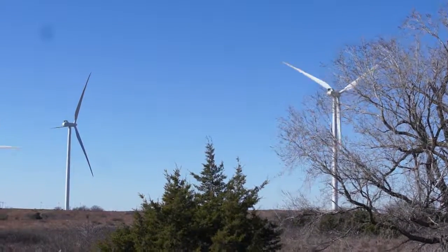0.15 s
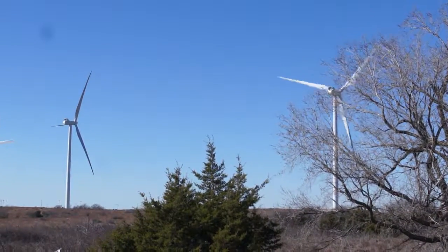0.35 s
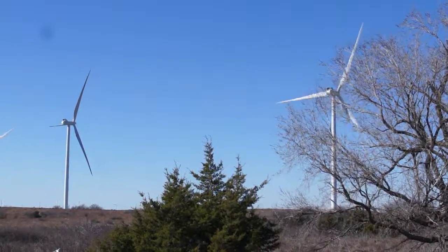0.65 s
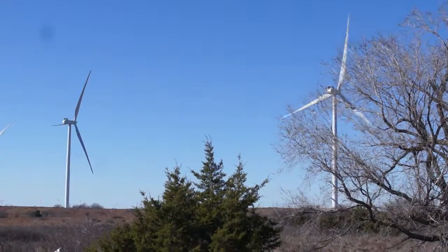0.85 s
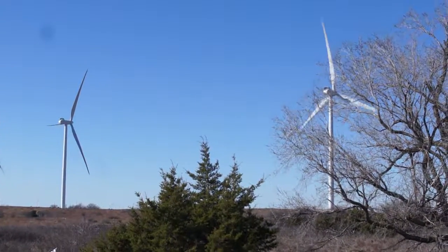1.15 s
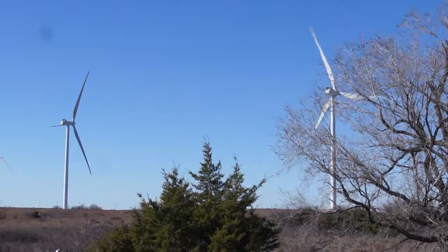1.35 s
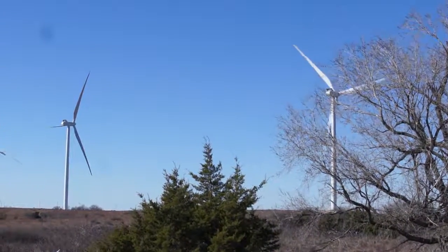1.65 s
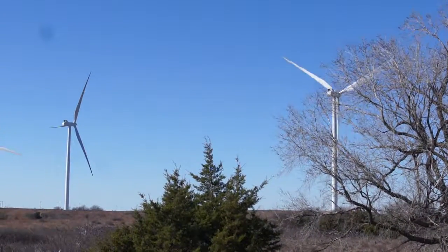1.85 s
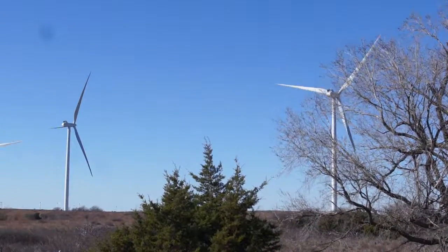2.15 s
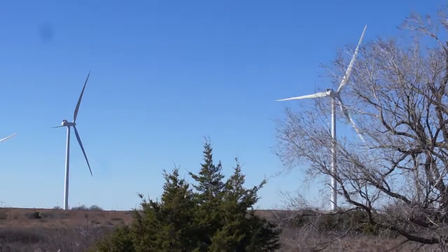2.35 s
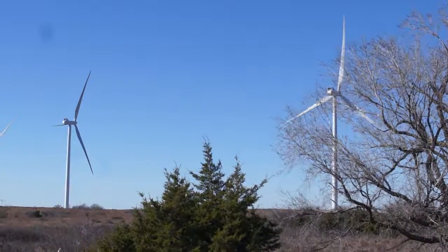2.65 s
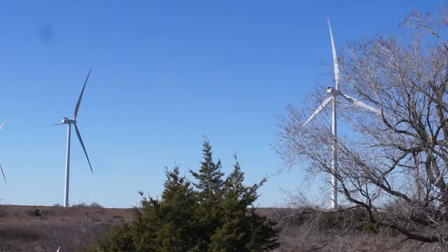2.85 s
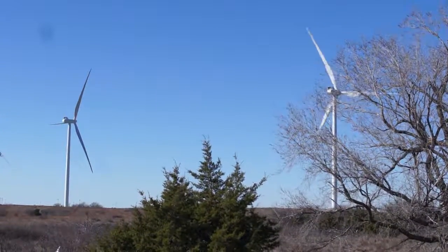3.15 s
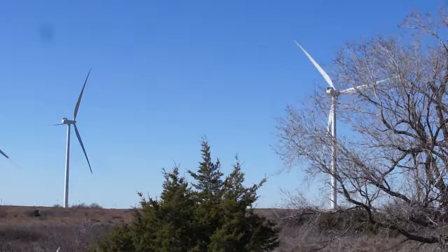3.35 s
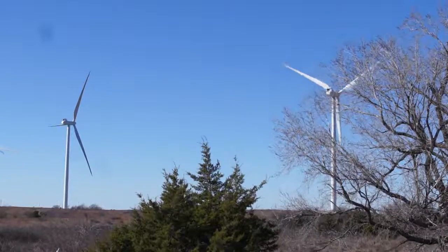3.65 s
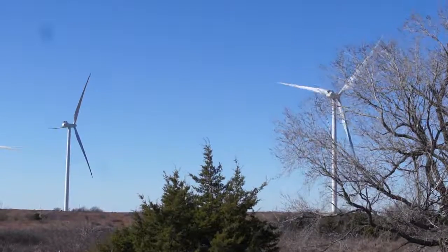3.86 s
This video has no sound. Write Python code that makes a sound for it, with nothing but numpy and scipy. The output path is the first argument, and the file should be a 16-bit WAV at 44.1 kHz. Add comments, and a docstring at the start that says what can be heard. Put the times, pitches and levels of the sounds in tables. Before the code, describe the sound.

Distant roar, probably turbine blades and traffic, fades early, returns midway and swells strongest at the end, with low drones, wind buffets and faint hiss on an open plain, through a small stereo camera.

```python
"""An open plain with wind turbines, heard through the two microphone ports of a small stereo camera.
Far off, a roar, probably blades and traffic, swells and fades: bands of noise, one singing near 615 Hz.
Two low machine drones sink slowly under it, with thin engine overtones, all made of sine tones.
At the ports wind rumbles and buffets, and dry branches hiss faintly, all shaped noise.
The camera adds a thin electronic buzz, a comb of high harmonics."""
import sys
import numpy as np
from scipy import signal
from scipy.fft import rfft, irfft
from scipy.io import wavfile

SR = 44100
rng = np.random.default_rng(int(sys.argv[2]) if len(sys.argv) > 2 else 0)


def int16_out(signal):
    """Quantize to a 16-bit WAV file."""
    q = np.round(np.clip(np.atleast_2d(signal).T, -1, 1) * 32767)
    wavfile.write(sys.argv[1], SR, q.astype(np.int16))


N = 175959
T = np.arange(N) / SR  # time [s]
FREQS = np.arange(N // 2 + 1) * SR / N  # spectrum bins [Hz]


def undb(db):
    """Decibels to gain."""
    return 10 ** (np.asarray(db) / 20)


def curve(table, axis=1):
    """Gain over time from one dB column of a table."""
    rows = np.array(table)
    return undb(np.interp(T, rows[:, 0], rows[:, axis]))


def pan(db):
    """Left and right gains for a level difference; positive leans left."""
    return undb(np.array([[db], [-db]]) / 2)


def walk(rate_hz):
    """Smooth random motion with a spread of 1, slower than about rate_hz."""
    spectrum = rfft(rng.standard_normal(N)) / (1 + (FREQS / rate_hz) ** 4)
    motion = irfft(spectrum, N)
    return (motion - motion.mean()) / motion.std()


def colour(table):
    """Left and right frequency responses, joined on a log pitch scale, with an added roll-off on top."""
    hz, left, right = np.array(table).T
    levels_db = [np.interp(np.log(FREQS + 1), np.log(hz), side) for side in (left, right)]
    return undb(levels_db) / (1 + (FREQS / hz[-1] / 2) ** 2)


def resonance(hz, width_hz):
    """Response of one resonance with steep skirts."""
    skirt_hz = 127  # how far the skirts reach
    peak = 1 / (1 + 2j * (FREQS - hz) / width_hz)
    return peak / np.sqrt(1 + ((FREQS - hz) / skirt_hz) ** 6)


def air(response, likeness=0, lag_s=0):
    """Unit stereo noise through a response; the part shared by both ports reaches the left one later."""
    shared, left, right = rfft(rng.standard_normal((3, N)))
    share = np.clip(likeness, 0, 1)
    both = np.array([shared * np.exp(-2j * np.pi * FREQS * lag_s), shared])
    own = np.array([left, right])
    noise = irfft((np.sqrt(share) * both + np.sqrt(1 - share) * own) * response, N)
    return noise / noise.std()


# strong partials of the camera's buzz, before the common trim:
# (harmonic number, left level [dB], right level [dB], likeness of the two channels [-1 to 1])
BUZZ_PARTIALS = [(14, -62, -66, 0.8), (15, -68, -64, 0.3), (19, -64, -63, -0.3), (20, -62, -59, -0.6),
                 (21, -73, -65, -1.0), (22, -64, -70, 0.3), (24, -58, -57, -0.3), (25, -64, -61, -0.3),
                 (27, -63, -70, 0.5), (29, -74, -68, -0.3), (30, -60, -62, 0.6), (32, -64, -60, -1.0),
                 (33, -67, -66, 0.7), (40, -78, -55, -0.8), (41, -67, -73, 1.0), (42, -57, -60, -0.9),
                 (43, -67, -68, -0.7), (45, -67, -68, -0.0), (47, -69, -67, 0.0), (51, -66, -69, -1.0),
                 (53, -61, -66, -1.0), (55, -60, -80, -0.8), (56, -65, -78, -0.4), (59, -67, -70, 0.4),
                 (60, -59, -80, -0.6), (61, -64, -72, -0.1), (63, -63, -74, 0.6), (64, -68, -74, -1.0),
                 (66, -67, -77, 0.5), (68, -64, -72, -0.8), (69, -67, -66, -0.1), (74, -80, -63, -0.6),
                 (76, -73, -61, -0.8), (78, -66, -72, -0.6), (79, -67, -74, -0.8), (81, -67, -76, 0.8),
                 (82, -80, -68, 0.8)]
BUZZ_HZ, BUZZ_TRIM_DB = 123.464, 0.5
WEAK_PARTIAL_DB, WEAK_SCATTER_DB = -74, -1  # the partials missing from the table
# one partial swells for a while; the half length is where the bump has fallen to 1/e
SWELLING_PARTIAL, SWELL_AT_S, SWELL_HALF_S, SWELL_DB = 40, 1.4, 0.33, 3.9


def camera_buzz():
    """A comb of high harmonics of one low pitch, with its own level and phase in each channel."""
    strong = {int(row[0]): row[1:] for row in BUZZ_PARTIALS}
    buzz = np.zeros((2, N))
    for k in range(14, 89):
        weak_levels = WEAK_PARTIAL_DB + WEAK_SCATTER_DB * rng.standard_normal(2)
        weak = (*weak_levels, rng.uniform(-0.65, 1))
        left_db, right_db, likeness = strong.get(k, weak)
        gain = undb([[left_db], [right_db]])
        if k == SWELLING_PARTIAL:
            bump = np.exp(-((T - SWELL_AT_S) / SWELL_HALF_S) ** 2)
            gain = gain * undb(SWELL_DB * (bump - .5))
        # the phase between the channels sets how alike they are
        between = np.arccos(np.clip(likeness, -1, 1))
        phase = rng.uniform(0, 2 * np.pi) + np.array([[0], [between]])
        buzz += gain * np.sin(2 * np.pi * k * BUZZ_HZ * T + phase)
    return buzz * np.sqrt(2) * undb(BUZZ_TRIM_DB)


# colour of the hiss of branches and microphone: (frequency [Hz], left level [dB], right level [dB])
HISS_COLOUR = [(800, -35, -40), (1850, 14.5, 15), (3000, 9, 9), (5400, 6, 3.5), (7450, 5, 2.5),
               (10400, 4, 1), (10500, -6.5, -3)]
# loudness of the hiss: (time [s], level [dB])
HISS_LEVEL = [(0, -52.5), (1.7, -52.5), (2.3, -50.5), (2.55, -46.5), (2.85, -46.5), (3.15, -49.5),
              (3.4, -51.5), (3.53, -47), (3.68, -51.5), (3.99, -49)]


def hiss():
    """Faint noise, separate at each port, that lifts as the breeze passes through dry branches."""
    return air(colour(HISS_COLOUR)) * curve(HISS_LEVEL)


# colour of the steady wind rumble: (frequency [Hz], left level [dB], right level [dB])
RUMBLE_COLOUR = [(10, -71, -71), (22, -38, -39), (45, -39, -34), (71, -7, 6), (93, 5, 0), (109, -1.5, -5),
                 (155, 0, -1), (211, 1, 2), (324, -2.5, -5.5), (390, -10.5, -7), (648, 6, -10),
                 (1500, -26, -36)]
RUMBLE_DB, RUMBLE_WAVER_DB, RUMBLE_LIKENESS, RUMBLE_LAG_S = -37.5, 0.54, 0.8, 0.00032
# buffets on the ports, before the eddies' own waver:
# (time [s], half length to 1/e [s], left level [dB], right level [dB], level of the deep thump [dB])
BUFFETS = [(0.8, 0.056, -39, -30.5, -63), (1.015, 0.15, -52, -34.5, -55), (1.47, 0.1, -41, -39, -41),
           (1.954, 0.073, -36, -39, -39.5), (2.337, 0.03, -47, -33, -51), (2.424, 0.066, -31, -36, -41),
           (2.775, 0.031, -58, -33, -46)]
# colour of a buffet: (frequency [Hz], left level [dB], right level [dB])
BUFFET_COLOUR = [(40, -4, -62), (106, 0.5, 7.5), (218, 2.5, 1), (323, -2, -3.5), (473, -14.5, -24),
                 (1200, -37, -40)]
# colour of its deep thump: (frequency [Hz], left level [dB], right level [dB])
THUMP_COLOUR = [(10, -60, -60), (22, -22, -23), (36, -2, -12), (65.3, 0, 10), (100, 10, 6), (220, -20, -37)]


def wind():
    """A steady rumble, and short eddies whose noise differs from port to port."""
    rumble = air(colour(RUMBLE_COLOUR), RUMBLE_LIKENESS, RUMBLE_LAG_S)
    out = rumble * undb(RUMBLE_DB + RUMBLE_WAVER_DB * walk(2.4))
    eddy = air(colour(BUFFET_COLOUR)) * undb(1.8 * walk(36))
    thump = air(colour(THUMP_COLOUR))
    for at, half, left_db, right_db, thump_db in BUFFETS:
        swell = np.exp(-((T - at) / half) ** 2)
        out = out + swell * (eddy * undb([[left_db], [right_db]]) + thump * undb(thump_db))
    return out


# distant machine drones, before waver and flutter:
# (pitch at the start [Hz], sag [Hz/s], level at the start [dB], rise [dB/s], pan to the left [dB])
DRONES = [(126.6, 0.98, -47.5, 2, -1.5), (80.6, 0.67, -49.5, 1.1, 5.5)]
DRONE_WAVER, DRONE_FLUTTER_DB = 0.0019, -1  # waver is a fraction of the pitch
DRONE_LAG_S = 0.00085  # the left port hears them this much later


def drones():
    """Two low sine tones of distant machinery, wavering and slowly sinking in pitch."""
    out = 0
    for hz, sag, db, rise, pan_db in DRONES:
        pitch = (hz - sag * T) * (1 + DRONE_WAVER * walk(1.5))
        cycles = np.cumsum(pitch) / SR - hz * np.array([[DRONE_LAG_S], [0]])
        tone = np.sqrt(2) * np.sin(2 * np.pi * cycles)
        level_db = db + rise * T + DRONE_FLUTTER_DB * walk(1.3)
        out = out + tone * undb(level_db) * pan(pan_db)
    return out


# overtones of the higher drone's engine:
# (order of its shaft rate, level against the roar's singing column before the trim [dB])
ENGINE_LINES = [(14, -14), (15, -5), (17, -14), (18, -15), (21, -18), (23, -19)]
FIRINGS_PER_TURN = 3
LINES_TRIM_DB, LINES_WAVER = -2, 0.0021  # waver is a fraction of the pitch


def engine_whine():
    """Clean overtones of the distant engine that rise and fall with the roar's singing band."""
    hz, sag = DRONES[0][:2]
    shaft_hz = (hz - sag * T) * (1 + LINES_WAVER * walk(6.1)) / FIRINGS_PER_TURN
    turns = np.cumsum(shaft_hz) / SR - shaft_hz * np.array([[SING_LAG_S], [0]])
    tones = sum(undb(db) * np.sin(2 * np.pi * (k * turns + rng.random())) for k, db in ENGINE_LINES)
    return np.sqrt(2) * tones * curve(ROAR, axis=1) * undb(LINES_TRIM_DB) * pan(SING_PAN_DB)


# distant roar, each band before its trim and the common flutter:
# (time [s], singing level [dB], body level [dB], hoot level [dB], upper band level [dB])
ROAR = [(0, -30, -32, -28.5, -31.5), (.12, -33.5, -29, -29.5, -38.5), (.3, -29.5, -35.5, -33.5, -34),
        (.55, -42.5, -35.5, -39, -39), (.9, -37.5, -34, -43, -40.5), (1.22, -41, -36.5, -42, -41.5),
        (1.42, -29, -31.5, -31.5, -35), (1.75, -28.5, -31.5, -34, -38.5), (2.05, -34, -35.5, -39, -40),
        (2.5, -34, -44, -35, -41.5), (2.8, -32.5, -37.5, -40.5, -39.5), (2.97, -25, -43, -37, -38.5),
        (3.15, -23, -31, -38.5, -37), (3.33, -21.5, -30, -28.5, -35.5), (3.5, -24, -35.5, -34.5, -38.5),
        (3.66, -26, -37.5, -35, -36), (3.8, -22.5, -33, -32, -40), (3.99, -19.5, -32, -35, -43)]
# colour of the roar's body: (frequency [Hz], left level [dB], right level [dB])
BODY_COLOUR = [(370, -23, -26), (468, -20.5, -9), (572, -3, 4), (637, -0.5, -1), (682, -4.5, 3.5),
               (780, -7.5, 8), (850, 9.5, 5), (882, -21, -7.5), (940, -7, -22), (1070, -27, -36),
               (1300, -40, -23.5)]
# colour of the roar's upper band: (frequency [Hz], left level [dB], right level [dB])
UPPER_COLOUR = [(840, -63, -35), (1048, 0, -1.5), (1258, 2.5, 5.5), (1260, -11.5, 9.5), (1530, 3.5, -2),
                (1890, -26.5, -8), (1890, -8, -11.5), (2220, -17, -13), (3060, -26, -61.5)]
SING_HZ, SING_WIDTH_HZ, SING_TRIM_DB, SING_PAN_DB = 614.3, 37, -2.45, 1.5
HOOT_HZ, HOOT_WIDTH_HZ, HOOT_TRIM_DB, HOOT_PAN_DB = 914.5, 57, 0.5, 5
BODY_TRIM_DB, UPPER_TRIM_DB, FLUTTER_DB = 2.5, 0.5, .25
# the left port hears the shared sound this much later
SING_LAG_S, HOOT_LAG_S, BODY_LAG_S, UPPER_LAG_S = 0.00017, .00007, .0001, .00016
BODY_LIKENESS, UPPER_LIKENESS = 1, 0.78  # sing and hoot are as alike at both ports as the body


def distant_roar():
    """A singing resonance, a hoot about a fifth above, a broad body and an upper band, fluttering in moving air."""
    sing_response = resonance(SING_HZ, SING_WIDTH_HZ) * pan(SING_PAN_DB)
    sing = air(sing_response, BODY_LIKENESS, SING_LAG_S) * curve(ROAR, axis=1) * undb(SING_TRIM_DB)
    body = air(colour(BODY_COLOUR), BODY_LIKENESS, BODY_LAG_S) * curve(ROAR, axis=2) * undb(BODY_TRIM_DB)
    hoot_response = resonance(HOOT_HZ, HOOT_WIDTH_HZ) * pan(HOOT_PAN_DB)
    hoot = air(hoot_response, BODY_LIKENESS, HOOT_LAG_S) * curve(ROAR, axis=3) * undb(HOOT_TRIM_DB)
    upper = air(colour(UPPER_COLOUR), UPPER_LIKENESS, UPPER_LAG_S)
    upper = upper * curve(ROAR, axis=4) * undb(UPPER_TRIM_DB)
    return (sing + body + hoot + upper) * undb(FLUTTER_DB * walk(3.8))


def scene():
    """Everything that reaches the two channels, from the background to the roar."""
    return camera_buzz() + hiss() + wind() + drones() + engine_whine() + distant_roar()


TOP_HZ = 11000


def record(dry):
    """The sound eases in and out over a few milliseconds, and the camera cuts the top steeply."""
    ease = np.minimum(1, np.minimum(T, T[-1] - T) / .003)
    top_cut = signal.ellip(12, .1, 80, TOP_HZ, fs=SR, output="sos")
    return signal.sosfilt(top_cut, dry * ease)


dry = scene()
out = record(dry)
int16_out(out)
```